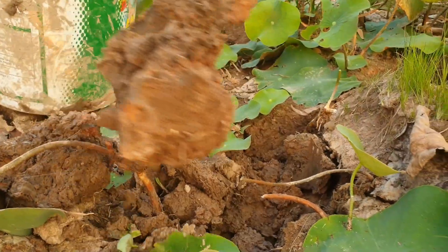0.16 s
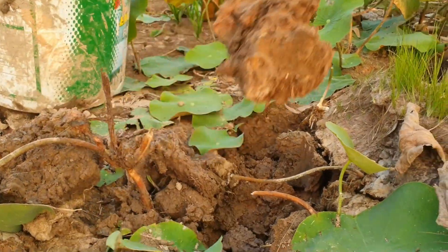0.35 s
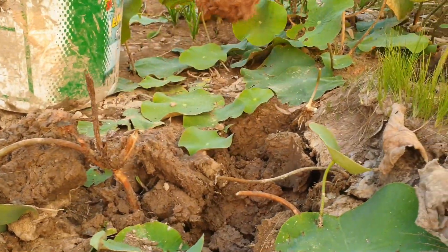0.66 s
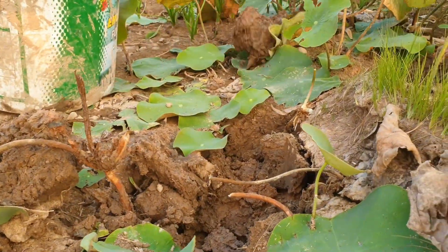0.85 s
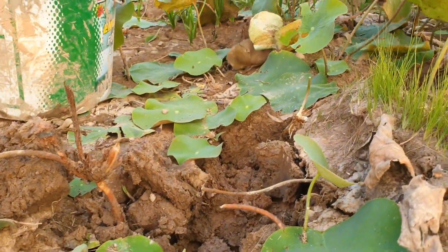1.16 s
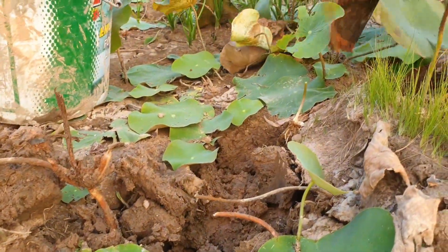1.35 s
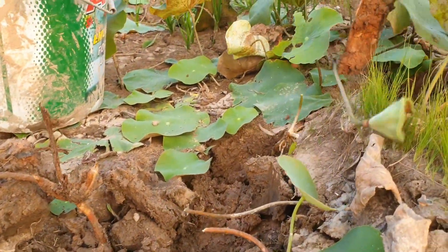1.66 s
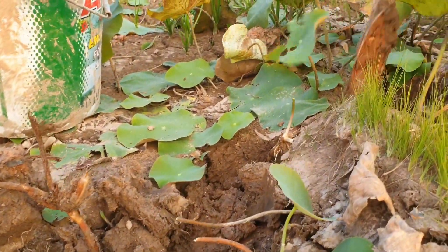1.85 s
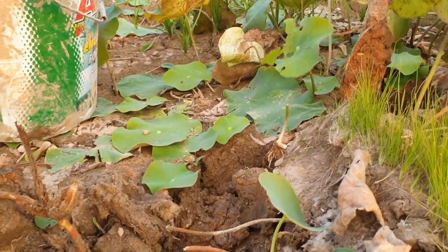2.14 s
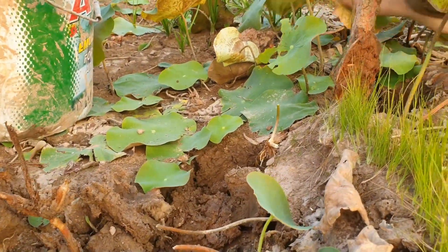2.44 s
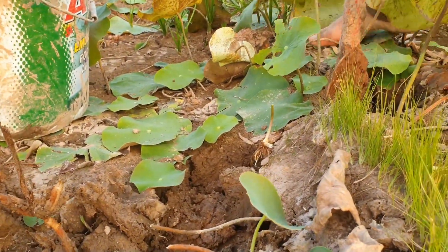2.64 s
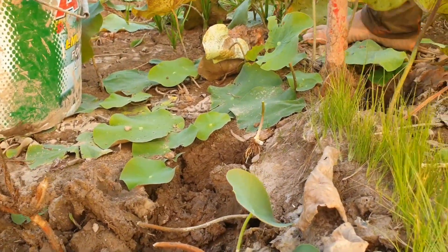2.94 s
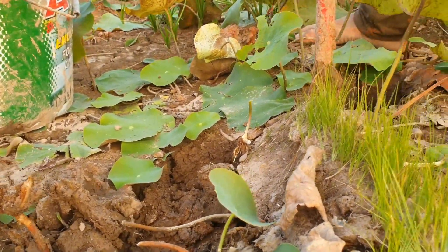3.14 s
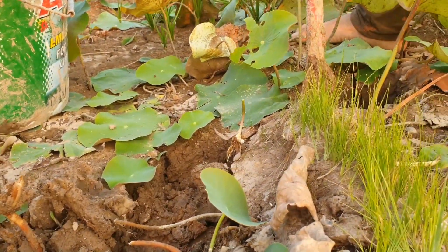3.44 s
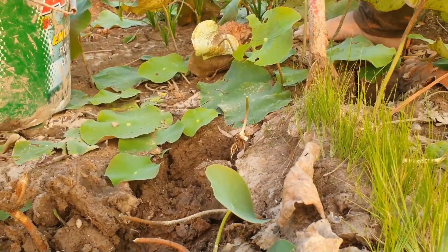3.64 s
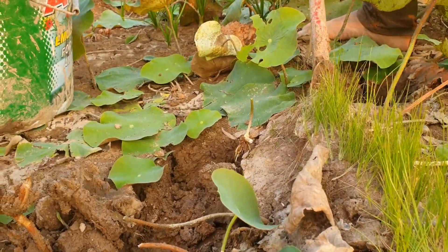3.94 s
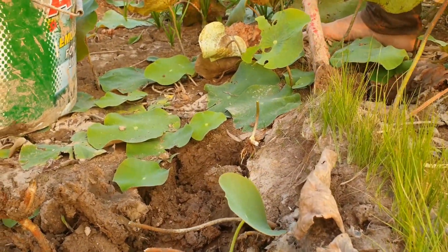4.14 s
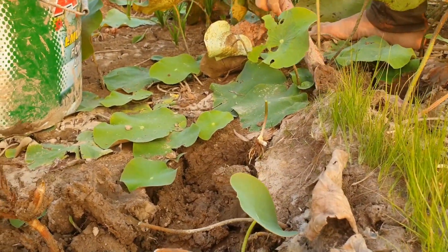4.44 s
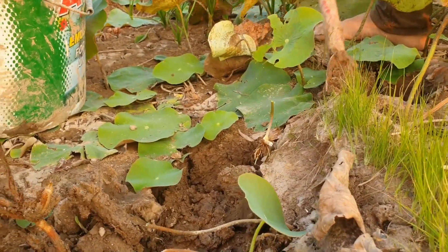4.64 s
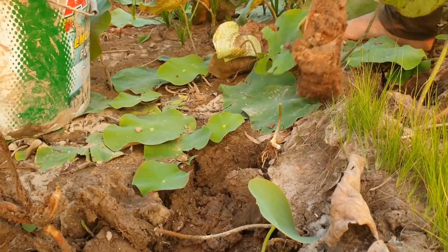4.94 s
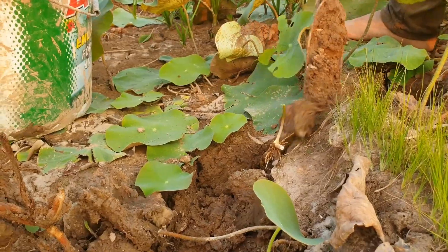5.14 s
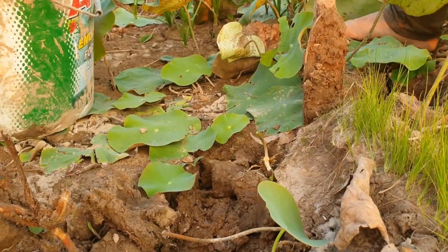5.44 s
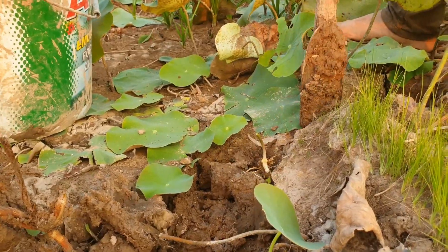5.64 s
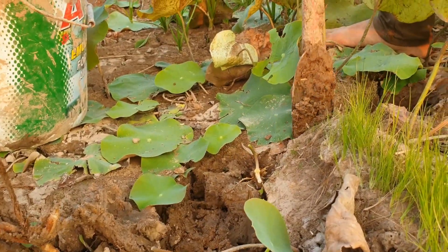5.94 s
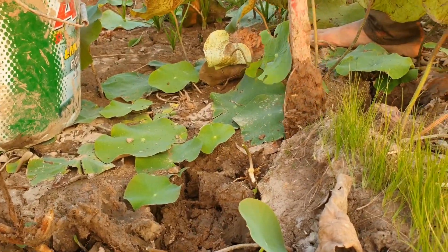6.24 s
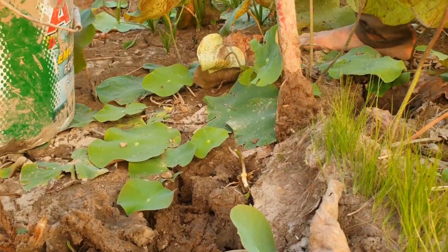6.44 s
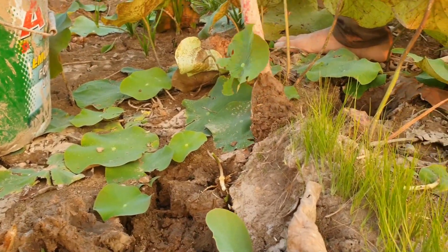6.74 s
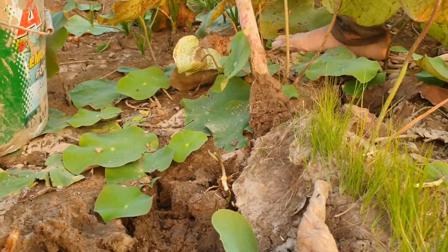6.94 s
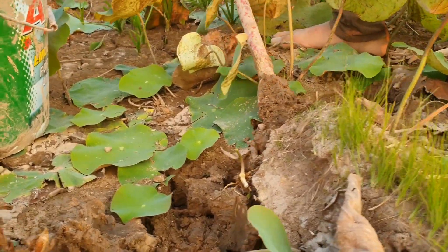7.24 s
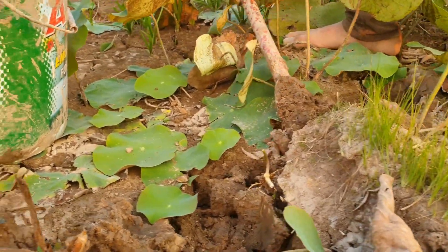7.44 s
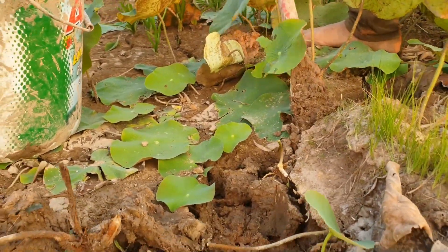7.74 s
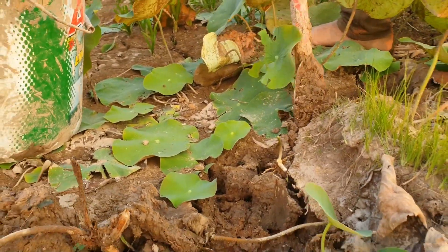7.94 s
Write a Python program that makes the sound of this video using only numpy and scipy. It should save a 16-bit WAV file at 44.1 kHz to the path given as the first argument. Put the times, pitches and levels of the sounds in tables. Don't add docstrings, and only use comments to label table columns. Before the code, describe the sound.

Outdoors in a dry pond bed, close stereo microphones catch a spade in damp clay. It opens on a short bright scrape and falling crumbs, then nearly settles. At 0.8 s a loud tearing scrape and cracks burst out, with crumbling, wet squelches and a hard dull thud at 1.3. More clods break to 1.7; a very sharp snap lands at 2.0. A dense gritty shower peaks near 2.5, then it quietens to sparse ticks and small snaps through 3 to 4. Root cracks cluster at 4.2 to 4.4, crisp snaps at 4.8 and 5.15, followed by light hollow taps on the blade. A low thump comes around 6.4, a rushing gritty slide at 6.6, then thick crackling from 6.9 to 7.4, fading to trickling crumbs and soft thuds by 8. A faint engine drones and high insects shimmer throughout.

```python
import sys
import numpy as np
from scipy import signal
from scipy.fft import rfft, irfft, next_fast_len
from scipy.io import wavfile
from scipy.ndimage import uniform_filter1d

SR = 44100
rng = np.random.default_rng(int(sys.argv[2]) if len(sys.argv) > 2 else 0)


def unload_audio(sound):
    columns = np.transpose(np.atleast_2d(sound))
    steps = np.round(np.clip(columns, -1, 1) * 32767)
    wavfile.write(sys.argv[1], SR, steps.astype(np.int16))


def ratio(d):
    e = np.asarray(d, float) / 20
    return 10 ** e


N = 356592


def evened(x):
    return x / np.sqrt(np.mean(x ** 2) + 1e-20)


def smoothed_twice(x, size, axis=-1):
    return uniform_filter1d(uniform_filter1d(x, size, axis), size, axis)


def read(points, hz):
    f, value = np.transpose(points)
    return np.interp(np.log(hz + 1), np.log(f + 1), value)


def add(mix, s, sound):
    part = mix[:, round(s * SR):][:, :sound.shape[1]]
    part += sound[:, :part.shape[1]]


def sides(db):
    return ratio(np.array([db / 2, -db / 2]))


def drift(hz):
    return evened(smoothed_twice(rng.standard_normal(N), max(int(SR / hz), 2)))


def resonate(x, hz, q):
    return signal.lfilter(*signal.iirpeak(hz, q, SR), x)


def band(x, low_hz, high_hz):
    return signal.lfilter(*signal.butter(2, [low_hz, high_hz], "band", fs=SR), x)


def above(x, hz, order=2):
    return signal.lfilter(*signal.butter(order, hz, "high", fs=SR), x)


def fuzzy_tone(hz, width):
    noise = rng.standard_normal(N)
    return evened(resonate(resonate(noise, hz, hz / width), hz, hz / width))


# (frequency [Hz], left-right likeness [share, clipped to -1 to 1 when
AIR_LIKENESS = [(60, 0.73), (240, 0.56), (950, -2), (3770, -0.4), (15000, 0.04)]
# (frequency [Hz], level [dB per Hz])
AIR_COLOUR = [(20, -8), (45, 4), (70, -1), (120, -12), (240, -7.5), (340, -20.5), (600, -41), (1700, -42),
              (4000, -59), (6500, -25.5), (7500, -23), (8400, -34.5), (12000, -23.5), (16500, -53)]


def air():
    frames, hz = N // 512 + 5, np.fft.rfftfreq(2048, 1 / SR)
    a, b, c, d, patches = rng.standard_normal((frames, len(hz), 5)).T
    patches = evened(uniform_filter1d(uniform_filter1d(patches, 20, 0), 8, 1))
    same = np.clip(read(AIR_LIKENESS, hz), -1, 1)[:, None]
    left = a + 1j * b
    right = same * left + np.sqrt(1 - same ** 2) * (c + 1j * d)
    z = np.array([left, right]) * ratio(read(AIR_COLOUR, hz)[:, None] + 1.05 * patches)
    wash = signal.istft(z, nperseg=2048, noverlap=1536)[1][:, :N]
    return ratio(-56) * evened(wash)


# (pitch [Hz], width [Hz], level [dB])
ENGINE_HUMS = [
    (59.6, 11.4, -55),
    (83.6, 5.8, -63),
    (119.4, 33.5, -63.5),
    (155, 6.1, -69.5),
]
# (time [s], level [dB])
ENGINE_SWELL = [(0, 3), (.6, -4), (1.2, 0.5), (2.5, 1), (3.1, 0), (3.7, 2.5), (5.5, 0.5), (7, 1), (8.1, -1)]


def engine_hum():
    return sum(ratio(db) * fuzzy_tone(hz, width) for hz, width, db in ENGINE_HUMS)


def engine():
    s, db = np.transpose(ENGINE_SWELL)
    direct = engine_hum()
    scattered = np.array([engine_hum(), engine_hum()])
    return ratio(np.interp(np.arange(N) / SR, s, db)) * (direct + 0.5 * scattered)


# (pitch [Hz], width [Hz], level [dB], throbs [per s], falls silent at [s])
CHORUSES = [
    (7080, 130, -69, 9.7, 9),
    (7510, 130, -70.5, 7.3, 9),
    (7350, 740, -67.5, 44, 9),
    (2000, 110, -80.5, 3, 0.78),
]


def insects():
    out = np.zeros((2, N))
    for hz, width, db, throb, until in CHORUSES:
        fade = np.clip((until - np.arange(N) / SR) / 0.083, 0, 1)
        whistle = np.array([fuzzy_tone(hz, width), fuzzy_tone(hz, width)])
        out += ratio(db + 2.5 * drift(throb)) * fade * whistle
    return out


# (time of peak [s], crumbs level
# [dB], rise [s], fall [s], clods over crumbs [dB])
SOIL_SHOWERS = [(0.0, -49.5, .02, 0.18, -2), (.18, -59, 0.071, 0.12, -2.5), (0.829, -42, 0.068, 0.24, 0),
                (0.961, -47, 0.17, 1, -0.5), (0.759, -55.5, 0.023, .3, -15),
                (1.31, -47.5, 0.14, 0.13, -3.5), (1.6, -76, 0.1, 0.34, 19),
                (1.729, -45.5, 0.085, 0.073, -4.5), (2.08, -55.5, 0.15, 0.26, 2),
                (2.34, -49.5, 0.17, 1, -0.5), (2.8, -57.5, 0.22, .24, -3), (2.999, -59.5, 1, 0.13, 1),
                (3.67, -60, 0.63, 0.59, -4.5), (4.669, -55.5, 0.31, 0.31, -2),
                (4.85, -55.5, 0.062, 0.19, -4.5), (6.28, -51.5, 0.14, 0.29, -3.5),
                (6.98, -59.5, 0.9, 1, -3),
                (.4, -66, 0.17, 0.15, -9), (1.861, -52.5, 0.019, 0.052, -3.5), (2.542, -42, 0.16, 0.18, -7),
                (2.69, -49.5, 0.21, 0.43, -5), (3.32, -65, 0.22, 0.22, -5.5), (3.94, -52.5, 0.26, 0.14, -3),
                (4.32, -53, 0.41, 0.23, -6), (5.163, -48.5, 0.11, 0.11, -11),
                (5.32, -56.5, 0.11, 0.26, -44), (5.54, -60, 0.29, 0.44, -8.5), (5.75, -61, 0.52, 1, -6.5),
                (6.61, -43, 0.16, 0.13, -5), (6.73, -59, 0.096, 0.53, -12), (7.28, -50.5, 0.43, 0.21, -11),
                (7.4, -53, 0.29, 0.12, -9), (7.62, -56.5, 0.14, 0.24, -7.5), (7.78, -65, 0.17, 0.33, -13),
                (8.08, -66.5, 0.31, .1, -21)]
STRETCHES = [
    0.73,
    0.79,
    0.91,
]
TRICKLES = [
    -88,
    -85,
    -80,
]


def flow():
    t = np.arange(0, N + 100, 100) / SR
    s, db, rise, fall, clod_db = np.transpose(SOIL_SHOWERS)[:, :, None]
    away = np.where(t < s, (s - t) / rise.clip(.01), (t - s) / fall.clip(.01))
    tops_db = [db + clod_db, db, db + 0.05 - 0.11 * clod_db]
    levels_db = []
    for top_db, stretch, rest_db in zip(tops_db, STRETCHES, TRICKLES):
        showers_db = top_db - 20 * away / stretch
        power = (ratio(showers_db) ** 2).sum(0) + ratio(rest_db) ** 2
        levels_db.append(np.interp(np.arange(N) / SR, t, 10 * np.log10(power)))
    return levels_db


def ticks():
    size = ratio(2.8 * np.minimum(rng.exponential(1, N), 3)) * (rng.random(N) < 83 / SR)
    t = np.arange(300) / SR
    puffs = signal.oaconvolve(size, t * np.exp(-t / 0.00052))[:N] * rng.standard_normal(N)
    puffs = evened(above(puffs, 1800))
    return np.array([puffs, np.roll(puffs, -3)])


# (lowest pitch [Hz], highest pitch [Hz], length [cycles], grains [per s], size spread [dB], clumping [dB])
GRAIN_SIZES = [
    (330, 1720, 0.91, 1500, 2.5, 2),
    (1990, 4590, 2.46, 5000, 1.5, 2),
    (5500, 12800, 1.9, 22000, 4.5, 5),
]


def crumble():
    levels_db = flow()
    clumps = .5 * drift(40) + .9 * drift(130)
    out, patches = np.zeros((2, N)), 18
    for level_db, (low_hz, high_hz, cycles, per_s, spread_db, clump_db) in zip(levels_db, GRAIN_SIZES):
        size = ratio(spread_db * np.minimum(rng.exponential(1, N), 5)) * rng.choice([-1, 1], N)
        size *= rng.random(N) < per_s / SR
        patch, layer = rng.integers(0, patches, N), np.zeros((2, N))
        for k, hz in enumerate(np.geomspace(low_hz, high_hz, patches)):
            u = np.arange(int(3 * cycles * SR / hz)) * hz / SR / cycles
            grain = u * np.exp(-4 * u) * np.sin(2 * np.pi * cycles * u)
            ring = evened(signal.oaconvolve(size * (patch == k), grain)[:N])
            ring = ring * (hz / low_hz) ** 0.78 * ratio(4.2 * drift(9.6))
            layer += [ring, np.roll(ring, rng.integers(-10, 8))]
        thin = np.clip((-32.0 - level_db) / 41.7, .3, 1)
        out += ratio(level_db + clump_db * thin * clumps) * evened(layer)
    return out + ratio(np.minimum(levels_db[1], -57) - 1) * ticks()


def squelch(length, db, from_hz, to_hz):
    u = np.arange(0, length, 1 / SR) / length
    shared, left, right, rough = rng.standard_normal((4, 12000))[:, :len(u)]
    lumps = ratio(4.5 * evened(uniform_filter1d(rough, 200)))
    drive = (shared + 0.71 * np.array([left, right])) * lumps
    turn = np.exp(2j * np.pi * np.cumsum(from_hz + (to_hz - from_hz) * u) / SR)
    r = np.exp(-np.pi * from_hz / 6.5 / SR)
    pocket = (turn * signal.lfilter([1], [1, -2 * r, r * r], drive / turn)).real
    return ratio(db) * np.sin(np.pi * u) * evened(pocket)


# (start [s], length [s], level
# [dB], first pitch [Hz], last pitch [Hz])
POCKETS = [(1.5, 0.13, -55, 2020, 2080), (1.6, 0.067, -46, 1520, 1160), (1.64, 0.11, -49, 710, 800),
           (2.29, 0.12, -51.5, 1300, 950), (2, 0.17, -54, 1950, 1800), (2.65, 0.066, -50, 3400, 3100),
           (4.26, 0.11, -55, 1300, 1390), (4.61, .11, -58, 2220, 1800), (4.5, .13, -58.5, 880, 600),
           (4.7, .06, -62, 1450, 1350), (7, 0.14, -49, 4460, 3800), (7.02, .04, -55, 1800, 1950),
           (7.55, 0.09, -65, 1700, 1350), (0.5, .25, -81, 2000, 2100), (.36, .07, -76, 1000, 1000),
           (.8, 0.047, -42.5, 1500, 1400), (.81, .035, -43, 2900, 2800), (1.1, .05, -49.5, 1300, 1200),
           (1.54, 0.022, -48.5, 1150, 1220), (5.5, .055, -53, 4500, 4100), (5.13, .045, -52, 5600, 5900),
           (0.7, 0.058, -52, 430, 380), (0, 0.048, -57, 324, 324), (7.5, 0.029, -47, 5600, 5300),
           (7.385, .025, -51, 2700, 2800)]


def squelching(soil):
    for s, *row in POCKETS:
        add(soil, s, squelch(*row))


def slide(s, db, rise, fall, hz, hiss):
    t = np.arange(-3 * rise, 5 * fall, 1 / SR)
    shared, left, right, rough = rng.standard_normal((4, 30000))[:, :len(t)]
    grit = (shared + 2.0 * np.array([left, right])) * ratio(2.0 * evened(uniform_filter1d(rough, 120)))
    broad = above(grit, .62 * hz, order=4)
    hollow = resonate(broad, hz, 3.5)
    swell = np.where(t < 0, np.exp(-(t / rise) ** 2), np.exp(-(t.clip(0) / fall) ** 2.3))
    sound = ratio(db) * swell * ((1 - hiss) * evened(hollow) + hiss * evened(broad))
    return max(s - 3 * rise, 0), sound[:, max(round((3 * rise - s) * SR), 0):]


# (resonance [Hz], share of hiss [0 to 1])
HISS_SHARE = [(1000, 0.18), (1500, 0.15), (2000, 0.93), (6000, 0.68)]
# (time of peak [s], level [dB], rise [s],
# fall [s], resonance [Hz])
RUBS = [(0.015, -34, 0.012, 0.011, 6260), (2.685, -48, 0.06, 0.025, 3280),
        (2.34, -44.5, 0.049, 0.099, 5600), (0.837, -26, 0.017, 0.0034, 5500),
        (0.872, -38.5, 0.0088, 0.042, 2420), (0.976, -42.5, 0.015, 0.044, 2950),
        (1.016, -38.5, 0.015, 0.008, 1060), (1.099, -35.5, 0.019, 0.02, 6000),
        (1.317, -34.5, 0.0033, 0.015, 805), (4.69, -56, 0.085, 0.065, 1310),
        (1.391, -41, 0.0081, 0.025, 1880), (1.46, -40.5, 0.0062, 0.003, 780),
        (1.699, -44.5, 0.042, 0.025, 880), (2.338, -48, 0.055, 0.095, 1190), (4.3, -52, 0.074, 0.061, 1400),
        (6.54, -36.5, 0.04, 0.11, 3900), (6.609, -33.5, 0.039, 0.042, 3600)]


def sliding(soil):
    for row in RUBS:
        add(soil, *slide(*row, read(HISS_SHARE, row[-1])))


# (frequency [Hz], level [dB per Hz])
CRACK_COLOUR = [(500, -12), (900, -7.5), (1500, -1), (3300, 5), (7000, 2), (16000, -11)]


def snap(peak_db, ring_hz, bright_db, body_db, pan_db):
    t = np.arange(1500) / SR
    hz = np.fft.rfftfreq(len(t), 1 / SR)
    gap, later_db, lag = rng.uniform([.0008, -14, -9], [.002, -5, 7])
    u = (t - .0045 - np.arange(3)[:, None] * gap) / .0009
    lead_in = .16 * np.exp(.5 * u.clip(None, 0))
    each = np.where(u < 0, lead_in, np.exp(-u.clip(0)))
    shape = ratio(later_db * np.array([.6, 0, 1.6])) @ each
    splinters, mud = rng.standard_normal((2, len(t)))
    splinters = splinters + (np.diff(shape, prepend=1) > 1 / 20) * 2.82
    treble = np.clip(np.log2(hz / 5500 + 1e-9), 0, 1)
    colour_db = read(CRACK_COLOUR, hz) + (bright_db + 16.0) * treble
    cracks = irfft(rfft(shape * splinters) * ratio(colour_db))
    cracks = cracks + 1.84 * resonate(cracks, ring_hz, 4.0)
    knock = band(mud * (u[0] > 0) * ratio(-60 * t / 0.035), 450, 1500)
    knock = 0.53 * ratio(body_db) * knock / abs(knock).max()
    sound = cracks / abs(cracks).max() + knock
    return ratio(peak_db + 4.0) * sides(pan_db)[:, None] * [sound, np.roll(sound, round(lag))]


def snapping(soil, table, body_db, pan_db):
    for s, *row in table:
        add(soil, s - .0046, snap(*row, body_db, pan_db))


# (time [s], peak level [dB], ring [Hz], top treble over peak [dB])
CLOD_CRACKS = [(0.8101, -22.5, 3800, -15), (0.8272, -19.5, 2080, -37), (0.959, -25, 2150, -5.5),
               (1.214, -27, 4150, -8), (1.2655, -33, 2020, -21), (1.3124, -17.5, 1440, -11),
               (1.381, -32.5, 1860, -23), (1.517, -24, 2270, -18), (1.6902, -31.5, 1490, -9),
               (2.0602, -34, 1820, -16.5), (2.523, -27, 2090, -14), (2.732, -33, 1510, -49),
               (3.924, -39.5, 3200, -19), (4.1665, -24, 3600, -8.5), (4.253, -37, 2310, 6),
               (4.6084, -42, 1960, -33), (5.1244, -35, 5100, -17), (5.3398, -44, 4230, -39),
               (0.103, -38, 1090, -37), (0.157, -38.5, 2500, -10), (7.282, -32, 6500, -2),
               (7.292, -34, 5030, -11), (7.252, -43, 1600, -35), (6.269, -31, 1770, -33),
               (.746, -46, 900, -30), (6.9055, -41, 4000, -24), (7.017, -28.5, 6500, -16)]


def clods(soil):
    snapping(soil, CLOD_CRACKS, body_db=-12, pan_db=0.2)


# (time [s], peak level [dB], ring [Hz], top treble over peak [dB])
ROOT_TEARS = [(0.189, -38, 5830, -7), (4.497, -48.5, 5500, -19), (1.5966, -35.5, 2500, -22),
              (1.9801, -37, 6550, -8), (3.259, -35, 6570, -2), (3.6715, -30, 3980, -0.5),
              (3.852, -33, 2650, 2), (4.107, -32.5, 5020, -3), (4.2381, -25, 3770, -21),
              (4.3194, -21.5, 3820, 2.5), (4.366, -39.5, 5450, -9), (4.431, -34.5, 3500, -7),
              (4.768, -34.5, 6700, -2.5), (5.135, -23.5, 5200, -16), (5.1524, -20.5, 5300, -16),
              (5.729, -35, 2040, -19), (5.759, -37, 3000, -35), (6.4562, -32.5, 2950, -33),
              (6.883, -20.5, 3230, -14.5), (6.937, -27.5, 4000, -8.5), (7.0244, -29, 1800, -8),
              (7.236, -31, 5660, -21), (7.2617, -20.5, 6400, 1), (7.3982, -36.5, 5450, -21),
              (7.427, -33, 2470, -2), (1.1572, -24, 6030, -8), (4.077, -34, 6700, 8),
              (5.2984, -28.5, 4250, -11), (6.772, -26.5, 4170, -7.5), (7.127, -28, 1950, -2)]


def roots(soil):
    snapping(soil, ROOT_TEARS, body_db=-20, pan_db=0.5)


# (time [s], peak level [dB], ring [Hz], top treble over peak [dB])
CRUST_SNAPS = [(0.832, -21, 6260, -26), (1.9364, -25.5, 6140, -10.5), (2, -14.5, 6330, -11),
               (2.8483, -38, 2840, 3), (3.1752, -33.5, 5860, 5), (3.3877, -40, 6740, 4),
               (3.4342, -34.5, 6730, 6), (4.3891, -29.5, 1530, -5), (4.559, -35, 6500, -14),
               (4.5708, -30, 7100, -11), (4.8185, -31, 6550, 12), (4.8397, -18.5, 5800, -0.5),
               (5.0419, -35.5, 6060, -3), (5.077, -36.5, 5650, -8), (5.092, -27, 5540, 0),
               (5.32, -35.5, 3660, -42), (5.437, -34.5, 4380, 0), (5.6803, -33, 5700, -15),
               (6.137, -34, 5500, -9), (6.919, -32, 2790, -7), (6.967, -24, 1880, -5),
               (7.075, -23.5, 4900, 5), (7.1178, -34, 5880, 0), (7.1892, -29.5, 6160, -27),
               (7.321, -28.5, 5670, -6), (7.344, -25, 2650, -2), (7.3779, -27, 2600, -8),
               (2.8, -35, 6500, -3), (5.464, -33.5, 3700, -15), (5.5117, -34.5, 4300, -8)]


def crust(soil):
    snapping(soil, CRUST_SNAPS, body_db=-38, pan_db=0)


def thud(peak_db, hz, t60, drop):
    t = np.arange(int(.35 * SR)) / SR
    pitch = hz * (1 - drop * (1 - np.exp(-t / 0.0032)))
    swing = np.sin(2 * np.pi * np.cumsum(pitch) / SR)
    rasp = evened(band(rng.standard_normal(len(t)), 0.14 * hz, 1.18 * hz))
    sound = (swing + 0.46 * rasp) * ratio(-60 * t / t60) * np.minimum(t / 0.001, 1)
    return ratio(peak_db) * np.array([sound, sound])


# (time [s], peak level [dB], pitch [Hz], time to fade 60 dB [s], pitch drop [share])
LUMP_FALLS = [(0.827, -36, 264, 0.085, 0.083), (0.963, -34, 227, 0.12, 0.024),
              (1.313, -14, 300, 0.014, 0.82), (1.325, -33, 76, 0.14, 0.17), (1.69, -45.5, 484, 0.1, 0.2),
              (2.058, -40, 213, 0.087, 0.1), (2.899, -43.5, 260, 0.073, 0.12),
              (5.179, -34, 457, 0.07, 0.51), (6.265, -33.5, 322, 0.025, 0.59),
              (6.458, -35.5, 230.3, 0.056, 0.37), (6.474, -37, 187.6, 0.32, 0.033),
              (7.301, -44, 259, 0.22, 0.42), (1.454, -38.5, 259, 0.071, 0.034),
              (2.279, -45, 260, 0.19, 0.12), (7.37, -42.5, 258, 0.1, 0.21),
              (7.411, -50, 263.4, 0.27, 0.098), (7.737, -51.5, 282, 0.19, 0.07),
              (7.792, -48, 250, 0.082, 0.28), (7.565, -47, 239, 0.13, 0.053),
              (7.878, -49.5, 266, 0.084, 0.12), (8.018, -50, 248, 0.11, 0.27)]


def thuds(soil):
    for s, *row in LUMP_FALLS:
        add(soil, s, thud(*row))


def pop(peak_db, hz, t60, edge):
    t = np.arange(900) / SR
    burst = rng.standard_normal(len(t)) * ratio(-60 * t / t60) + 3.0 * (t == 0)
    ring = resonate(burst, hz, 3.5)
    bright = above(burst, 1400)
    sound = ring / abs(ring).max() + edge * bright / abs(bright).max()
    stereo = np.array([sound, np.roll(sound, rng.integers(0, 6))])
    return ratio(peak_db) / abs(sound).max() * stereo


# (time [s], peak level [dB], ring [Hz])
GRIT_POPS = [(0.9951, -31, 2670), (1.1674, -28, 5960), (2.285, -36, 1490), (2.4274, -34, 3370),
             (2.452, -29, 4660), (2.7438, -33, 2870), (2.9243, -42, 3510), (3.3024, -46, 2330),
             (3.3498, -42, 5980), (3.5269, -51, 2070), (3.601, -46, 4900), (3.6117, -39.5, 6980),
             (3.689, -35.5, 6790), (3.7793, -43, 4280), (3.802, -41.5, 2750), (3.8282, -41, 4440),
             (3.984, -38, 3350), (4.0931, -45.5, 6940), (4.1145, -38.5, 3310), (4.2083, -35.5, 3680),
             (4.2534, -33.5, 2310), (4.6818, -38, 2700), (4.7531, -49, 6880), (4.8574, -38.5, 1600),
             (4.8752, -43, 1510), (5.103, -33, 6210), (5.1674, -36, 6290), (5.3124, -32.5, 3810),
             (5.6376, -42, 4260), (5.6874, -45, 5950), (5.7138, -38.5, 2120), (5.7976, -44, 2140),
             (5.8242, -46, 2110), (5.8594, -51, 1810), (5.9489, -46, 6640), (5.994, -43, 6960),
             (6.0185, -43.5, 6940), (6.0394, -47, 3740), (6.221, -35.5, 5850), (6.2362, -41, 2280),
             (6.3709, -39, 4400), (6.4953, -37, 2630), (6.5133, -30, 4200), (6.5485, -35, 4340),
             (6.6066, -24, 3840), (6.7516, -38, 4300), (6.8523, -45, 3200), (6.9288, -32, 4000),
             (6.9814, -40, 3740), (7.0394, -36, 6200), (7.0517, -32, 5870), (7.0916, -40, 1850),
             (7.1756, -35, 6100), (7.229, -27, 5490), (7.2504, -35, 2870), (7.3513, -32, 2690),
             (7.4424, -43, 2260), (7.5605, -44.5, 1790), (7.5894, -42.5, 1530)]


def grit(soil):
    for s, peak_db, hz in GRIT_POPS:
        add(soil, s, pop(peak_db, hz, t60=.02, edge=0.92))


# (time [s], peak level [dB], ring [Hz])
BLADE_TAPS = [(2.428, -36, 1120), (2.523, -34, 1120), (4.685, -44, 942), (5.341, -54, 832),
              (5.464, -50, 985), (5.512, -42, 1070), (5.561, -50, 1060), (5.613, -59, 1030),
              (5.639, -54, 1160), (5.68, -54, 1130), (5.728, -54, 1100), (7.017, -40, 1140),
              (7.25, -44, 746)]


def taps(soil):
    for s, peak_db, hz in BLADE_TAPS:
        add(soil, s, pop(peak_db, hz, t60=0.028, edge=.05))


def surroundings(x):
    t = np.arange(2500) / SR
    signs = rng.choice([-1., 1.], (2, len(t)))
    echoes = signs * (rng.random((2, len(t))) < .08) * ratio(-60 * t / .045)
    echoes[:, :90] = 0
    return signal.oaconvolve(x, echoes / np.linalg.norm(echoes[0]), axes=1)[:, :N]


def scene():
    background = air() + engine() + insects()
    soil = crumble()
    for play in (squelching, clods, roots, crust, thuds, grit, taps):
        play(soil)
    soil = soil + ratio(-10.0) * surroundings(soil)
    sliding(soil)
    return soil + background


def band_limit(x):
    return signal.sosfilt(signal.butter(12, 16990, fs=SR, output="sos"), x)


# (frequency [Hz], left over right [dB])
MIC_OPENINGS = [(60, -3), (150, -7), (380, -3.5), (950, 2.5), (2380, -1), (5980, 2), (15000, -10)]


def record(dry):
    size = next_fast_len(N + 4096)
    hz = np.fft.rfftfreq(size, 1 / SR)
    treble = 1 / (1 + (hz / 15850) ** 120) + 0.0056
    bass = 1 / np.sqrt(1 + (42 / (hz + 1)) ** 6)
    colour = sides(read(MIC_OPENINGS, hz)) * treble * bass
    mix = irfft(rfft(dry, size) * colour, size)[:, :N]
    return band_limit(mix)


dry = scene()
out = record(dry)
unload_audio(out)
```